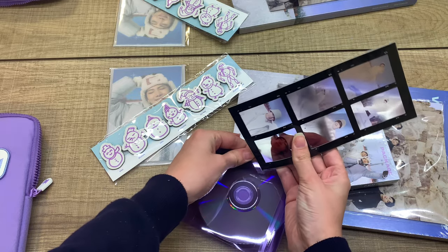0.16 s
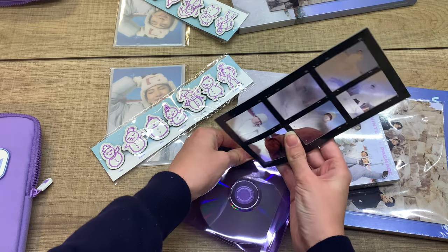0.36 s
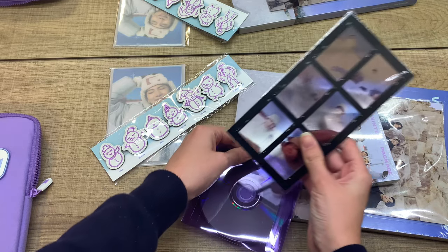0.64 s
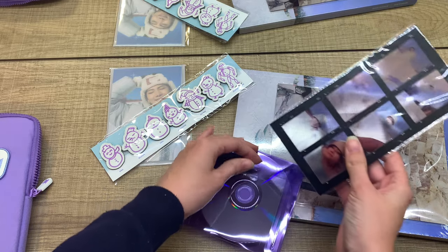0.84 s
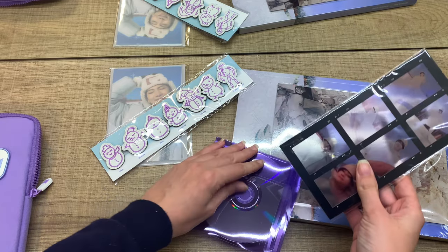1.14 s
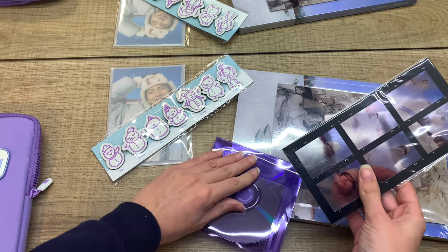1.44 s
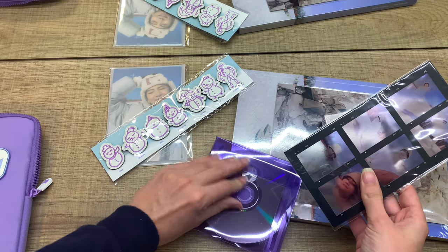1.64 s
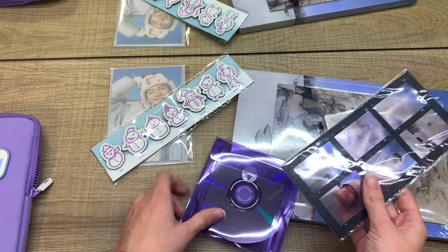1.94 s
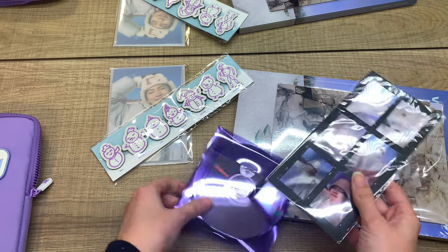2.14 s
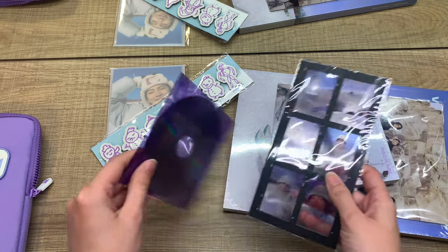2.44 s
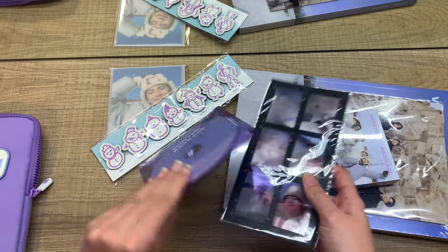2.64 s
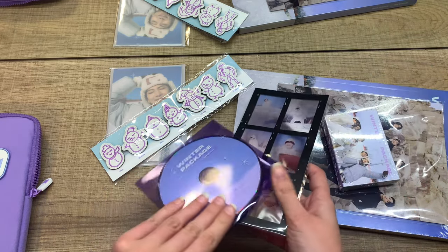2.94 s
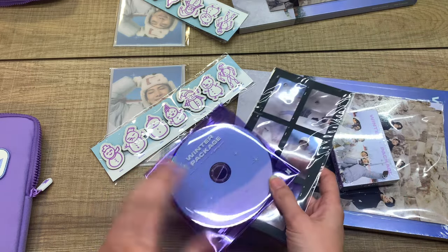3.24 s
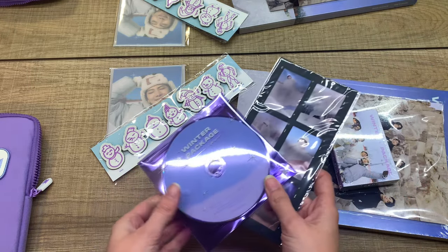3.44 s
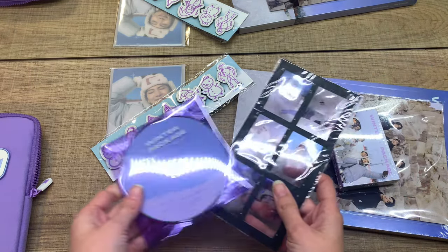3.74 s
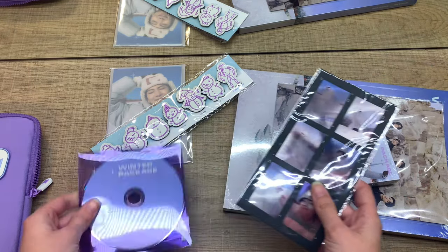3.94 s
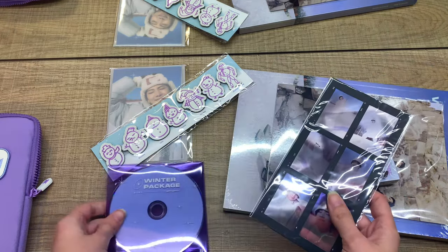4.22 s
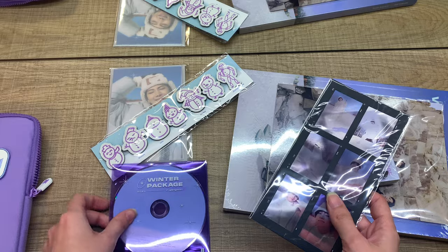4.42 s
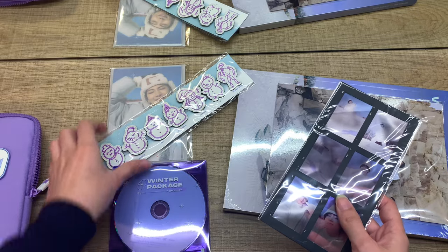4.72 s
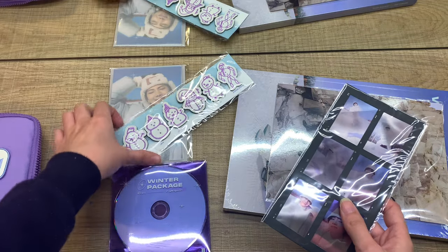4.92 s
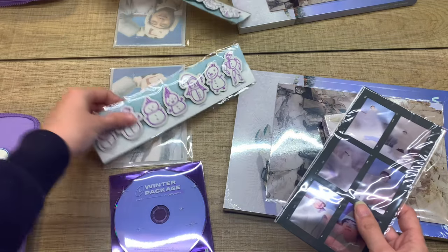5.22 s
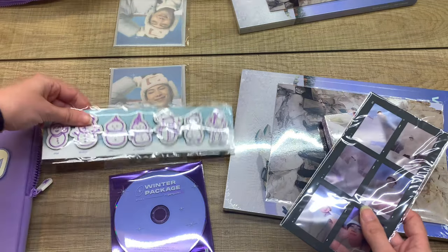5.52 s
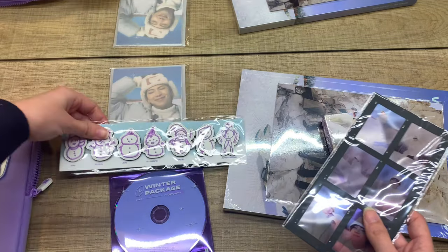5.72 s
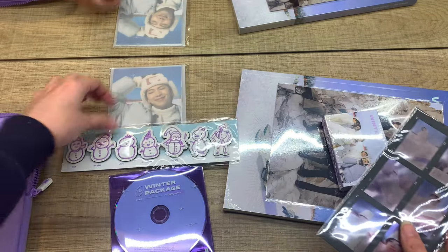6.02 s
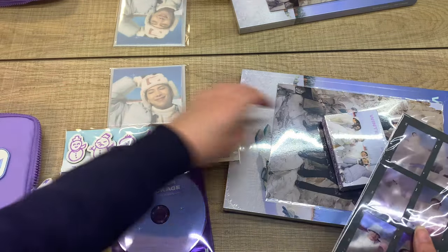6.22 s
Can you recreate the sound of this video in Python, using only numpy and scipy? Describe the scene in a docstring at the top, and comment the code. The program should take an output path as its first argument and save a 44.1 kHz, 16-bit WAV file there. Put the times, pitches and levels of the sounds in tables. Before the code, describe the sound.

Close handling of film-wrapped cards and a disc: sharp early clack and knocks, a near-silent middle, soft taps, then a dense burst of crackling plastic.

```python
"""Sleeved cards and a disc on a wooden table

Close stereo pickup in a small room: cards, a disc and stickers in thin plastic sleeves are laid out.
The film snaps, crackles and rustles in bursts of coloured noise; a stiff card clacks off the disc and rings.
Set-down knocks ring the disc's modes, bumps boom in the tabletop, and forearms rub as low, filtered noise.
One sleeve squeaks on the wood; close reflections, a short diffuse tail and faint room air surround it all."""
import sys
import numpy as np
from scipy import signal
from scipy.fft import rfft, irfft
from scipy.io import wavfile

SR = 44100
rng = np.random.default_rng(int(sys.argv[2]) if len(sys.argv) > 2 else 0)


def transcribe(u):
    """Save the signal u as a 16-bit wav file named by the first command-line argument.

    u: samples, shape (n,) or (channels, n), limited to [-1, 1]; the rate is SR.
    q: integer samples, one column per channel.
    """
    v = np.clip(np.atleast_2d(u).T, -1, 1)
    q = np.round(v * 32767).astype(np.int16)
    wavfile.write(sys.argv[1], SR, q)


N = 280917
TIME = np.arange(N) / SR

# a card's edge springing off the disc: start_s, level_db (before each layer's trim)
CLACK_TIMES = [(0.4238, -14.5), (0.425, -13), (0.4273, -15.5), (0.4302, -16.5)]


def from_db(db):
    """Decibels to gain."""
    return 10 ** (np.asarray(db) / 20)


def rms_one(x):
    """Scale to rms 1."""
    return x / np.sqrt(np.mean(x ** 2) + 1e-20)


def colour(x, points):
    """Causal (minimum-phase) filter whose gain follows (Hz, dB) points."""
    size = 16384 if x.shape[-1] > SR else 2048
    hz, db = np.transpose(points)
    grid = np.maximum(np.fft.rfftfreq(size, 1 / SR), 1)
    gain = from_db(np.interp(np.log(grid), np.log(hz), db))
    # folding the cepstrum forward in time gives the minimum phase
    cepstrum = irfft(np.log(gain))
    cepstrum[1:size // 2] *= 2
    cepstrum[size // 2 + 1:] = 0
    response = irfft(np.exp(rfft(cepstrum)))[:size // 2]
    filtered = signal.oaconvolve(np.atleast_2d(x), response[None], axes=1)
    return filtered[:, :x.shape[-1]].reshape(x.shape)


def low_pass(x, hz, order):
    """Butterworth low-pass."""
    return signal.sosfilt(signal.butter(order, min(hz, SR / 2 - 1), fs=SR, output="sos"), x)


def high_pass(x, hz):
    """Second-order Butterworth high-pass."""
    return signal.sosfilt(signal.butter(2, hz, "high", fs=SR, output="sos"), x)


def resonate(x, hz, width_hz):
    """One narrow resonance."""
    b, a = signal.iirpeak(hz, hz / width_hz, fs=SR)
    return signal.lfilter(b, a, x)


def ports(pair):
    """Two unrelated signals become left and right: alike in the bass, apart in the treble."""
    # difference between the two microphone ports: frequency_hz, side_re_mid_db
    port_width = [(150, -61), (350, -45.5), (700, -12), (1400, -6), (2800, -1), (5500, 0.5), (10000, -7.5),
                  (15000, -7.5)]
    mid, side = pair[0], colour(pair[1], port_width)
    return mid + side * [[1], [-1]]


def noise(size):
    """White noise as the two ports hear it."""
    return ports(rng.standard_normal((2, size)))


def pan(x, db):
    """Lean to the left: left minus right is db."""
    return x * from_db([[db / 2], [-db / 2]])


def lean(x, points):
    """Pan each frequency by its own (Hz, left minus right dB) amount."""
    hz, db = np.transpose(points)
    left = colour(x[0], np.c_[hz, db / 2])
    right = colour(x[1], np.c_[hz, -db / 2])
    return np.stack([left, right])


def add(track, s, sound):
    """Mix a sound in at time s."""
    at = max(round(s * SR), 0)
    track[:, at:at + sound.shape[-1]] += sound[:, :N - at]


def waver(hz):
    """Slow random motion with an rms of 1."""
    return rms_one(low_pass(rng.standard_normal(N), hz, order=2))


def strokes(starts, lengths, levels_db, attack_s, fade_db_per_s):
    """Gain of a series of hand movements: each swells, holds and, its length over, dies away."""
    t, power = TIME[::32], 0  # coarse steps suffice for a slow gain
    for s, length, db in zip(starts, lengths, levels_db):
        swell = np.clip((t - s) / attack_s, 0, 1)
        fade_db = fade_db_per_s * np.maximum(t - s - length, 0)
        power = power + (swell * from_db(db - fade_db)) ** 2
    return np.interp(TIME, t, np.sqrt(power))


def grains(per_s, size_db, smooth_db):
    """Random tiny slips of uneven size, each dying over a millisecond or so, on smooth friction."""
    born = rng.random(N) < per_s / SR
    sizes = from_db(size_db * np.minimum(rng.exponential(1, N), 4)) * born
    power = signal.lfilter([1], [1, -np.exp(-1 / (0.0014 * SR))], sizes ** 2 + 1e-18)
    return noise(N) * np.sqrt(power / power.mean() + from_db(smooth_db) ** 2)


def crack(spectrum, rise_s, flutter_db, flutter_t60):
    """A millisecond burst, then the sheet's short flutter; the energy is that of 1 ms at rms 1."""
    t = TIME[:SR // 16]
    burst = (t / rise_s * np.exp(1 - t / rise_s)) ** 6
    flutter = from_db(flutter_db - 60 * t / flutter_t60) * np.minimum(t / rise_s, 1) ** 2
    sound = colour(noise(len(t)) * (burst + flutter), spectrum)
    return rms_one(sound) * np.sqrt(SR / 1000 / len(t))


def modal_ring(hz, gain, t60, contact_s):
    """Decaying sines, one for each mode, that swell over the time of contact."""
    t = TIME[:SR // 2]
    decay = from_db(-60 * t / t60[:, None])
    modes = gain[:, None] * decay * np.sin(2 * np.pi * hz[:, None] * t)
    return modes.sum(axis=0) * (1 - np.exp(-t / contact_s)) * np.ones((2, 1))


def room_air():
    """The still room: faint steady noise, strongest in the bass."""
    # colour of the still room: frequency_hz, level_db (relative)
    air_colour = [(15, -40.5), (25, -9), (64, -0.5), (114, 0.5), (317, -12.5), (394, -6), (887, -22.5),
                  (1130, -21), (1560, -28), (7110, -33), (11000, -28.5), (14800, -34.5), (16000, -49.5)]
    return from_db(-71) * rms_one(colour(noise(N), air_colour))


def film_spectrum(body_db, sheen_db):
    """Each facet of film has its own balance of body and sheen and mild resonances of its own."""
    # common colour of the film: frequency_hz, level_db
    film_colour = [(60, -49), (250, -13.5), (450, 2.5), (780, -16), (1050, -6), (1500, -3.5), (2900, -4),
                   (4500, -2.5), (7000, -3.5), (10000, 5), (13000, -5.5), (16000, -7)]
    grid = np.geomspace(60, 16000, 48)
    hz, db = np.transpose(film_colour)
    common = np.interp(np.log(grid), np.log(hz), db)
    # body counts in full below 1.9 kHz, sheen above 11.8 kHz
    tilt = np.interp(np.log(grid), np.log([1900, 4570, 7000, 11807]), [body_db, 0, 0, sheen_db])
    facet = 4 * rng.standard_normal(len(grid))
    return np.c_[grid, common + tilt + facet]


def film_crack(body_db, sheen_db):
    """One buckle of the limp film, which stops fluttering almost at once."""
    return crack(film_spectrum(body_db, sheen_db), rise_s=.0013, flutter_db=-7, flutter_t60=.042)


def film_snaps(level_db, body_db, sheen_db, count):
    """A buckling crease tips neighbours over, each later and weaker; count includes the first."""
    # loudest buckles of the film, before the trims passed in: start_s, level_db, body_db, sheen_db
    snaps = [(0.11, -51, -9, -9), (0.1286, -19, -13, 3), (0.1697, -44.5, 2, -23), (0.189, -29.5, -7, -29),
             (0.316, -42, -45, 4), (0.379, -35, -18, 15), (0.3937, -29.5, -5, -4.5),
             (0.7157, -43.5, -12, -46), (1.114, -39, -10.5, -13.5), (1.127, -53, -6.5, -18),
             (1.647, -56.5, -7.5, -17), (2.088, -60.5, -0.5, -20), (2.227, -55, -10, -17),
             (2.295, -55, -5, -12), (2.7949, -46, -0.5, -25.5), (2.9173, -40.5, 12, -19),
             (3.573, -50.5, -9, -28.5), (3.891, -60, -0.5, -7), (4.177, -30, 4.5, -29),
             (4.197, -45, 6, -28), (4.262, -51.5, 1.5, -16), (4.5384, -29, -7, -26.5), (4.542, -29, 3, -22),
             (4.566, -41, 2, -17), (4.8587, -48, -4, -17.5), (4.898, -43.5, 3, -16), (4.9631, -43, -3, -29),
             (4.9785, -42.5, 5, -14), (5.0127, -32, -1.5, -29), (5.1134, -31.5, -5, -9),
             (5.1567, -43, 2, -12), (5.1693, -29.5, -4.5, -3), (5.2027, -17, -17, -5),
             (5.206, -27.5, -8, -13), (5.2164, -35, -15, -13), (5.227, -31, 2, -7), (5.246, -35.5, 2, -1),
             (5.2727, -32, -19, -8.5), (5.2991, -34, -8, -11), (5.3061, -37.5, -3, -13),
             (5.3259, -36, -19, -20), (5.3328, -38.5, -4.5, -16.5), (5.4491, -29, -5.5, -5.5),
             (5.455, -38, -6, -11.5), (5.4875, -43, 4.5, -35), (5.5771, -55, -6, -24),
             (5.588, -44.5, -11, -39), (5.5995, -31, -13.5, -20), (5.606, -36.5, -5, -12),
             (5.6393, -41.5, 7.5, -7), (5.7099, -56.5, -10, -2), (5.7316, -47, 6, -11),
             (5.7511, -26.5, -9.5, -8.5), (5.7553, -28.5, -5.5, -8.5), (5.7972, -45, -6.5, -34),
             (5.8121, -42, -3, -27), (5.8621, -44.5, 0, -46), (5.8855, -40.5, -5, -12.5),
             (5.979, -31.5, -25, -20), (6.007, -39, -12, -31), (6.025, -35.5, 1.5, -5.5)]
    mean_gap_s, follow_loss_db = 0.0053, 13
    out = np.zeros((2, N))
    for s, db, body, sheen in snaps:
        gaps = mean_gap_s * (.5 + rng.random(count))
        for k, gap in enumerate(gaps):
            snap = film_crack(body + body_db, sheen + sheen_db)
            add(out, s, from_db(db + level_db - k * follow_loss_db) * snap)
            s = s + gap
    return pan(out, db=1.6)


def slide_gains():
    """How strongly the sleeves scrape and hiss; the film catches and lets go as it slides."""
    # sleeves sliding over card and wood, before layer trims: start_s, length_s, scrape_db, hiss_db
    slides = [(0.117, 0.032, -63.5, -58.5), (0.274, 0.15, -82, -69.5), (0.465, 0.11, -66, -69.5),
              (0.697, 0.25, -75.5, -81.5), (0.997, 0.072, -87, -70.5), (1.302, 0.061, -72, -83.5),
              (1.515, 0.21, -82, -83.5), (2.243, .25, -88, -73), (2.621, 0.84, -89.5, -89),
              (3.602, 0.15, -75, -69.5), (4.388, 0.17, -74, -77), (4.951, 0.056, -54, -61),
              (5.053, .1, -70, -63.5), (5.129, 0.18, -57.5, -61), (5.392, 0.052, -63.5, -67.5),
              (5.544, 0.028, -60.5, -73), (5.774, 0.23, -69.5, -69)]
    s, length, scrape_db, hiss_db = np.transpose(slides)
    grip = from_db(1.5 * waver(hz=21.85))
    scrape = grip * strokes(s, length, scrape_db, attack_s=0.045, fade_db_per_s=172)
    hiss = grip * strokes(s, length, hiss_db, attack_s=0.045, fade_db_per_s=172)
    return scrape, hiss


def film_crinkles(push, body_db, sheen_db, count):
    """A moving sleeve buckles at random across count facets: light pushes swish, firm ones crackle."""
    crinkles_per_s, crinkle_db, spread_db = 81, 7.5, 0.5
    firm_push_db, growth = -57.5, 0.73
    born = rng.random(N) < crinkles_per_s / SR
    # crinkles grow faster than the push itself
    force = push * (push / from_db(firm_push_db)) ** growth
    uneven_db = spread_db * np.clip(rng.standard_normal(N), -2, 2)
    sizes = born * force * from_db(crinkle_db + uneven_db)
    dealt, out = rng.integers(0, count, N), 0
    for k in range(count):
        snap = film_crack(body_db, sheen_db)
        out = out + signal.oaconvolve([sizes * (dealt == k)], snap, axes=1)[:, :N]
    return pan(out, db=1.6)


def sleeve_rustle(scrape, hiss, scrape_db, hiss_db):
    """Film drags over card and wood and hisses against itself; its facets crackle, each in its own colour."""
    # film against card and wood: frequency_hz, level_db
    scrape_colour = [(500, -22.5), (1000, -4.5), (1550, -2.5), (2600, -8), (4200, -2), (6000, -9.5),
                     (9000, -35)]
    # film against film: frequency_hz, level_db
    hiss_colour = [(3000, -20), (6000, 0), (9000, 6), (12000, 0), (16000, -5)]
    facet_hz, slips = np.geomspace(500, 16000, 36), 0
    for _ in range(4):
        facet = np.c_[facet_hz, 5 * rng.standard_normal(len(facet_hz))]
        # one facet after another takes over, so the colour keeps shifting
        share = from_db(3.5 * waver(hz=22))
        crackle = colour(grains(per_s=160, size_db=3.5, smooth_db=-4), facet)
        slips = slips + share * rms_one(crackle)
    low = scrape * from_db(scrape_db) * rms_one(colour(slips, scrape_colour))
    high = hiss * from_db(hiss_db) * rms_one(colour(slips, hiss_colour))
    return pan(low + high, db=2.0)


def disc_knocks():
    """Every knock rings the same modes; a soft contact spares the high ones, the grip damps and detunes them."""
    # disc in its sleeve knocking on the table: start_s, level_db, contact_brightness_hz,
    # free_share (of the ring time, left by the fingers), pitch_factor
    hits = [(0.339, -49, 693, 0.36, 1.34), (0.4279, -13.5, 590, 0.92, 1.025),
            (0.4895, -19.5, 680, 0.32, 1.104), (1.915, -48, 1193, 1, 1), (2.9194, -44.5, 1500, 0.28, 1.8),
            (2.927, -40, 1207, 0.24, 1.55), (4.1819, -26.5, 1010, 0.32, 0.96),
            (4.207, -48, 1090, 0.24, 1.5), (4.225, -50, 900, 0.31, 0.76), (4.5374, -46, 2500, 0.31, 0.9)]
    # modes of disc and sleeve when let free: frequency_hz, level_db, t60_s
    disc_modes = [(398, 0, .075), (398, -22, .38), (120, -15, .2), (185, -17, .09), (455, -14, .04),
                  (542, -8, .07), (630, -14, .05), (800, -13, .04), (980, -8, .04), (1150, -6, .05),
                  (1400, -7, .04), (1750, -1, .05), (2030, -8, .04), (3400, -10, .03), (3970, -7, .03)]
    out = np.zeros((2, N))
    hz, mode_db, t60 = np.transpose(disc_modes)
    for s, db, bright_hz, free, pitch in hits:
        gain = from_db(db + mode_db) / np.hypot(1, (hz / bright_hz) ** 2)
        add(out, s, modal_ring(hz * pitch, gain, t60 * free, contact_s=0.0011))
    return high_pass(out, hz=94.0)


def film_scuffs(level_db):
    """A sleeve catches and drags: a tight run of tiny slips."""
    # short drags, before the level trim: start_s, level_db (rms), length_s, body_db, sheen_db
    drags = [(0.382, -53.5, 0.055, 5, -3), (0.411, -29, 0.0058, -17.5, -30), (1.058, -65.5, 0.053, -12, -6),
             (1.244, -72, 0.033, 19, -20), (1.906, -55.5, 0.03, 9.5, 3), (2.19, -61, 0.057, -3.5, -7),
             (2.263, -59, 0.045, 1, -6), (2.899, -62.5, 0.042, 9, -14.5), (3.048, -56, 0.014, 8.5, 3.5),
             (3.163, -70, 0.017, 3.5, -24), (3.514, -68.5, 0.026, 0, -24), (3.675, -64, 0.038, -4, 4),
             (3.735, -68.5, 0.063, -0.5, -25.5), (4.165, -55, 0.021, 13, -20.5),
             (4.516, -52.5, 0.052, -3, -24), (5.187, -43.5, 0.038, 0, -5), (5.589, -49.5, 0.014, 7, -19),
             (5.724, -58, 0.026, 10, 1), (5.975, -48, 0.052, -0.5, -6.5)]
    out, slips = np.zeros((2, N)), grains(per_s=260, size_db=1.0, smooth_db=-2.5)
    t = TIME[:SR // 4]
    for s, db, length, body, sheen in drags:
        at = round(s * SR)
        stroke = np.minimum(t / 0.02, 1) * from_db(-60 * np.maximum(t - length, 0) / 0.086)
        sound = colour(slips[:, at:at + len(t)] * stroke, film_spectrum(body, sheen))
        add(out, s, from_db(db + level_db) * rms_one(sound) * np.sqrt(length / t[-1]))
    return pan(out, db=1.5)


def card_clack(crack_db):
    """A stiff edge slips free and chatters."""
    # colour of the stiff card: frequency_hz, level_db
    card_colour = [(100, -46.5), (600, -16.5), (1400, -5), (1650, -12), (1900, -3.5), (2400, -18),
                   (3100, -7.5), (4500, -7.5), (5700, -9.5), (6500, 6), (7400, -6), (8400, 6), (9000, -2.5),
                   (10000, 5.5), (12500, -1.5), (16000, -11.5)]
    out = np.zeros((2, N))
    for s, db in CLACK_TIMES:
        clack = crack(card_colour, rise_s=0.00074, flutter_db=-13.5, flutter_t60=0.068)
        add(out, s, from_db(db + crack_db) * clack)
    return pan(out, db=2.2)


def card_ring(ring_db):
    """The first clack sets the card ringing briefly, close to the microphone."""
    # the card's own modes: frequency_hz, level_db (re first clack, before ring_db), t60_s
    card_modes = [(1520, -28, 0.055), (1928.4, -13, 0.027), (3093, -24, 0.0083), (4670, -22, 0.062),
                  (7010, -15.5, 0.028), (6559, -11.5, 0.034), (6560, -19, 0.041), (8770, -21, .05),
                  (9500, -11.5, 0.027), (9170, -16, 0.028)]
    out = np.zeros((2, N))
    hz, mode_db, t60 = np.transpose(card_modes)
    s, db = CLACK_TIMES[0]
    gain = from_db(db + ring_db + mode_db)
    add(out, s, modal_ring(hz, gain, t60, contact_s=0.00065))
    return pan(out, db=3)


def card_shimmer(swell_s):
    """After the clack the card trembles against its sleeve, which keeps clusters of close modes ringing."""
    # clusters of high modes: centre_hz, width_hz, level_db (re first clack), t60_s (until stilled)
    clusters = [(2200, 1200, -45, .3), (4760, 1300, -38, 0.4), (6753, 900, -32.5, 0.37),
                (8350, 500, -31.5, 0.51), (9755, 1800, -31, .26), (13240, 2500, -30, .18)]
    out, t = np.zeros((2, N)), TIME[:SR // 2]
    s, db = CLACK_TIMES[0]
    # the hand comes down on the sleeve after 0.19 s and stills it at 300 dB/s
    damping_db = 300 * np.maximum(t - .19, 0)
    chatter = grains(per_s=260, size_db=4.5, smooth_db=-2)[:, :len(t)]
    for hz, width, level, t60 in clusters:
        edges = [hz - width / 2, hz + width / 2]
        band = signal.sosfilt(signal.butter(2, edges, "band", fs=SR, output="sos"), chatter)
        decay = from_db(db + level - 60 * t / t60 - damping_db)
        add(out, s, decay * np.minimum(t / swell_s, 1) * rms_one(band))
    return pan(out, db=2)


def table_bumps(boom_db, boom_width_hz):
    """A soft, rough push by hand or packet sets the tabletop booming for a moment."""
    # bumps on the tabletop: start_s, level_db (rms), length_s, boom_hz, top_hz
    pushes = [(0.575, -27.5, 0.041, 135.5, 671), (0.617, -27, 0.034, 101, 680),
              (0.651, -48.5, .03, 54.5, 200), (1.918, -47.5, 0.069, 130, 600),
              (1.978, -54.5, 0.044, 122.6, 196), (2.928, -60.5, 0.025, 110, 402),
              (3.076, -41.5, 0.048, 63.6, 335), (3.169, -69.5, 0.088, 517, 776),
              (4.18, -42.5, 0.015, 520, 1290), (4.191, -56, 0.07, 219, 780), (5.218, -56.5, 0.06, 352, 810),
              (5.755, -36.5, 0.03, 59.7, 170.5), (5.986, -56.5, 0.058, 425, 700)]
    out, t = np.zeros((2, N)), TIME[:SR // 4]
    for s, db, length, boom_hz, top_hz in pushes:
        push = noise(len(t)) * np.sqrt(np.abs(np.sin(np.pi * np.minimum(t / length, 1))))
        # the hand settles: its rasp loses 24 dB while the boom carries on
        rasp = push * from_db(-24 * t / length)
        boom = resonate(push, boom_hz, boom_width_hz)
        thud = high_pass(low_pass(rasp + from_db(boom_db) * boom, top_hz, order=6), hz=43.7)
        add(out, s, from_db(db) * rms_one(thud) * np.sqrt(length / t[-1]))
    return out


def arm_rub(level_db):
    """Cloth dragging on the tabletop makes it rumble, the deeper the more weight is on it."""
    # drags of forearm or packet, before the level trim: start_s, length_s, level_db,
    # extra_boom_db (from its weight)
    rubs = [(0.64, 0.027, -52, -4), (0.712, 0.11, -51.5, 7), (0.88, 0.066, -59, 3), (1.04, 0.034, -61, 7.5),
            (1.231, 0.04, -63.5, 2), (2.0, 1.94, -69.5, 0), (3.141, 0.041, -62, 0), (4.523, 0.04, -60.5, 4),
            (4.847, 0.64, -58, -16.5), (5.83, 0.32, -57, -4)]
    # colour of the rubbed wood: frequency_hz, level_db
    wood_colour = [(15, -44), (25, -25), (49, -3), (95, -5), (300, -18), (338, -22.5), (460, -25),
                   (537, -25.5), (1050, -39.5), (1500, -54), (1950, -84), (3300, -120)]
    s, length, db, boom_db = np.transpose(rubs)
    drag = strokes(s, length, db + level_db, attack_s=0.029, fade_db_per_s=57)
    weight = strokes(s, length, db + boom_db + level_db, attack_s=0.029, fade_db_per_s=57)
    pressure = from_db(2.5 * waver(hz=18.3))  # the arm presses unevenly
    rumble = pressure * rms_one(colour(noise(N), wood_colour))
    boom = low_pass(rumble, hz=135, order=1)
    return drag * (rumble - boom) + weight * boom


def sleeve_squeak():
    """Stick and slip drives two narrow resonances of a sleeve nudged along the wood."""
    # swell and fade of the squeak: time_s, level_db
    nudge = [(4.36, -94), (4.419, -74), (4.452, -63), (4.486, -78), (4.525, -58), (4.55, -87)]
    # resonances of the sleeve: frequency_hz, width_hz, level_db (relative)
    squeak_modes = [(1552, 48, 4.5), (3380, 110, -11.5)]
    s, db = np.transpose(nudge)
    slips, tone = noise(N), 0
    for hz, width, level in squeak_modes:
        tone = tone + from_db(level) * resonate(slips, hz, width)
    sounding = (TIME > s[0]) * (TIME < s[-1])
    return from_db(np.interp(TIME, s, db)) * sounding * rms_one(tone)


def near_echoes(x):
    """Tabletop and packets throw the film's sound straight back, combing it at about the same power."""
    # close reflections: delay_s, level_db (re direct)
    reflections = [(.00095, -18.5), (.0021, -16.5), (.0037, -9.5)]
    out, power = x.copy(), 1
    for delay, db in reflections:
        add(out, delay, from_db(db) * x)
        power = power + from_db(db) ** 2
    return out / np.sqrt(power)


def room(x, wet_db, t60, first_s):
    """A diffuse tail, fed from the left channel, that builds up as the first walls answer."""
    # colour of the tail: frequency_hz, level_db (relative)
    tail_colour = [(100, 3.5), (500, 9.5), (1500, 3.5), (2800, -1.5), (4500, -1.5), (7000, -6), (8500, 1.5),
                   (11000, -6), (16000, -4.5)]
    t = TIME[:SR * 2 // 3]
    envelope = from_db(-60 * t / t60) * np.minimum(t / first_s, 1) ** 2
    tail = colour(noise(len(t)) * envelope, tail_colour)
    tail = rms_one(tail) / np.sqrt(len(t))
    return from_db(wet_db) * signal.fftconvolve(x[:1], tail, axes=1)[:, :N]


def off_axis(x):
    """An all-pass makes the left port trail the right in the treble, by half a cycle near 3 kHz."""
    centre_hz, width_hz = 2957, 2000
    poles = signal.iirpeak(centre_hz, centre_hz / width_hz, fs=SR)[1]
    return np.stack([signal.lfilter(poles[::-1], poles, x[0]), x[1]])


def scene():
    """All the handling in the room, over its faint background."""
    # uneven radiation of the card toward the two ports: frequency_hz, left_minus_right_db
    card_lean = [(1500, 0.5), (5000, 1), (9000, 2), (11500, -3.5), (15000, -7)]
    scrape, hiss = slide_gains()
    film = film_snaps(level_db=-2, body_db=6.5, sheen_db=10.0, count=3)
    film = film + film_crinkles(np.hypot(scrape, hiss), body_db=3.5, sheen_db=-6.5, count=8)
    film = film + film_scuffs(level_db=-0.5)
    rustle = sleeve_rustle(scrape, hiss, scrape_db=-2.0, hiss_db=2) + sleeve_squeak()
    knocks = disc_knocks()
    clack = card_clack(crack_db=2)
    ring = high_pass(card_ring(ring_db=5.0), hz=900) + card_shimmer(swell_s=.015)
    wood = table_bumps(boom_db=13.0, boom_width_hz=53.4) + arm_rub(level_db=0.5)
    tail = room(film + clack + from_db(-5) * knocks, wet_db=-16.5, t60=0.2, first_s=0.029)
    sleeves = off_axis(near_echoes(film + rustle) + tail)
    card = lean(clack + ring, card_lean)
    return sleeves + card + knocks + wood + room_air()


def record(dry):
    """The microphone sheds the deepest bass; the top is cut steeply above 16.1 kHz."""
    thin = high_pass(dry, hz=23.3)
    return signal.sosfilt(signal.ellip(10, .1, 80, 16100, fs=SR, output="sos"), thin)


dry = scene()
out = record(dry)
transcribe(out)
```